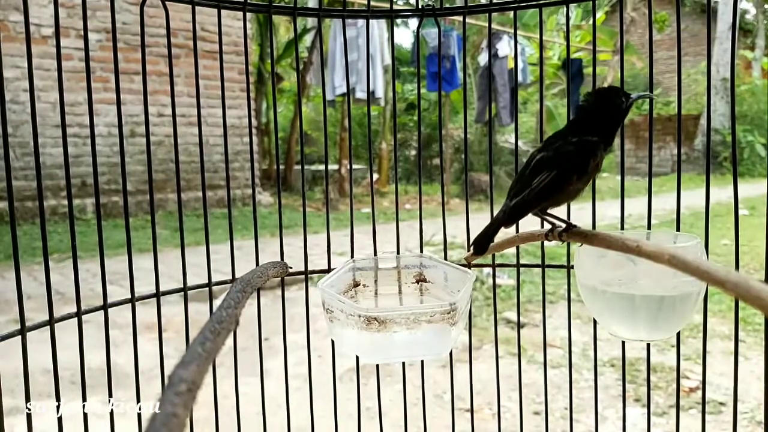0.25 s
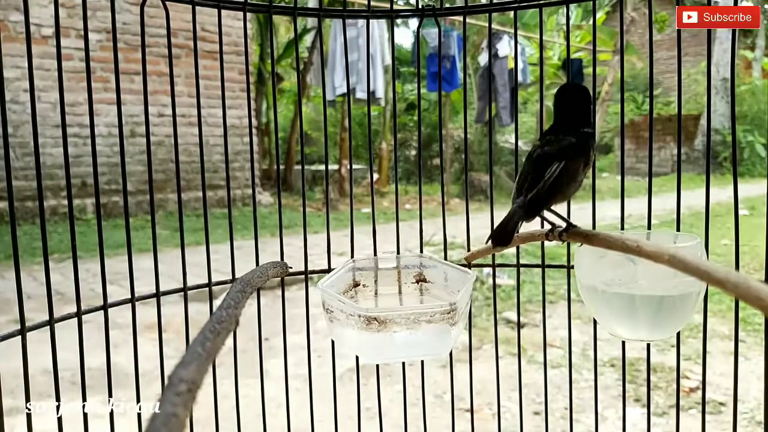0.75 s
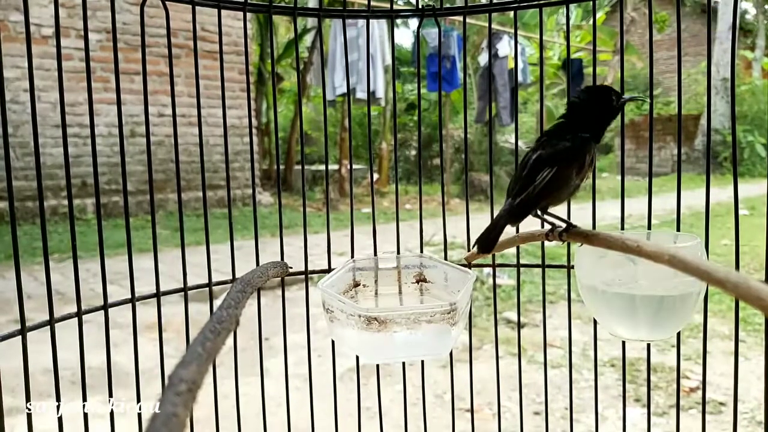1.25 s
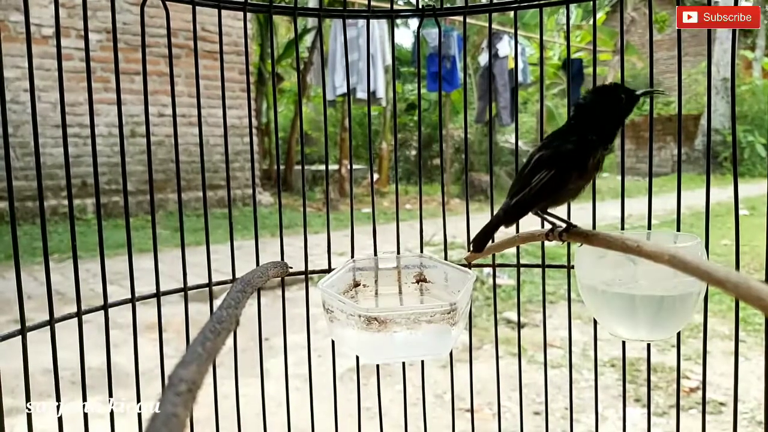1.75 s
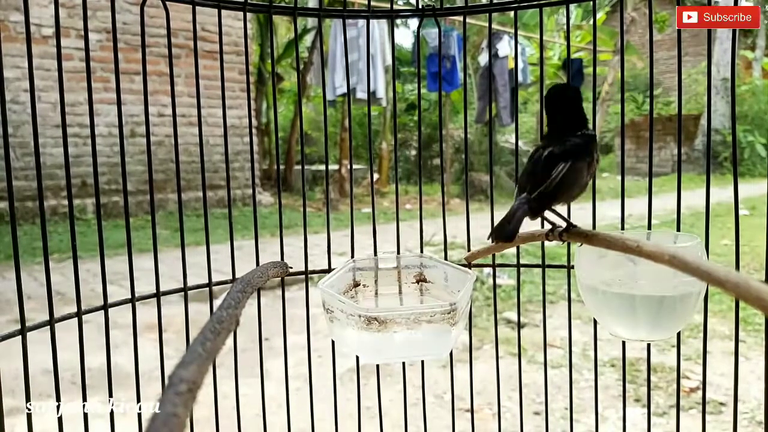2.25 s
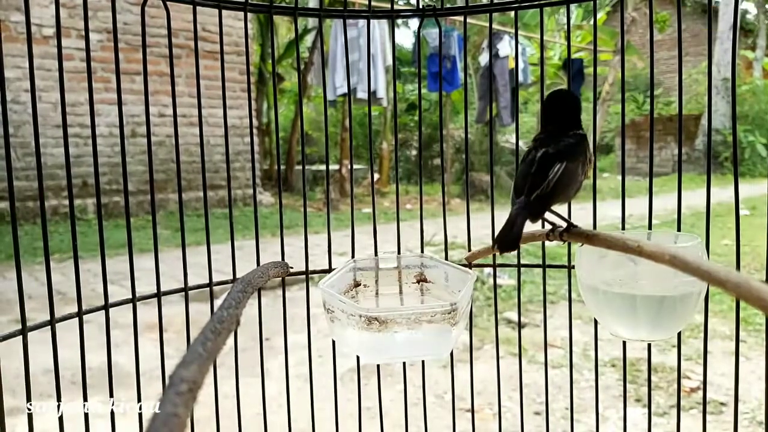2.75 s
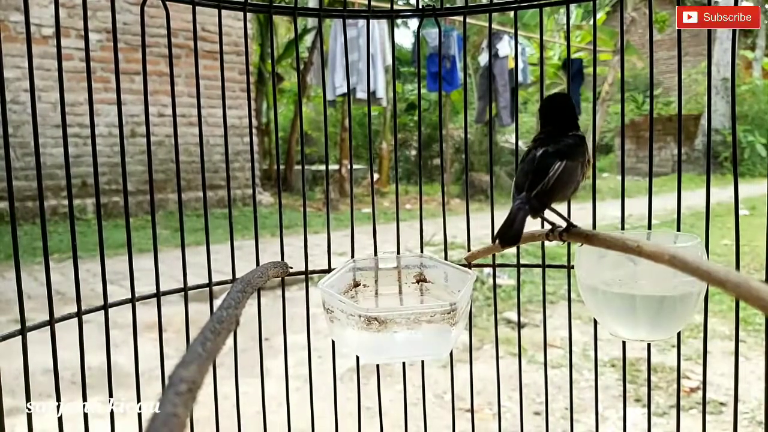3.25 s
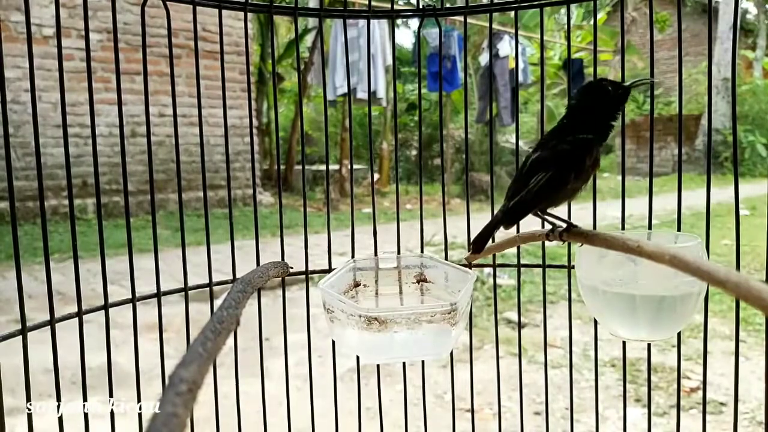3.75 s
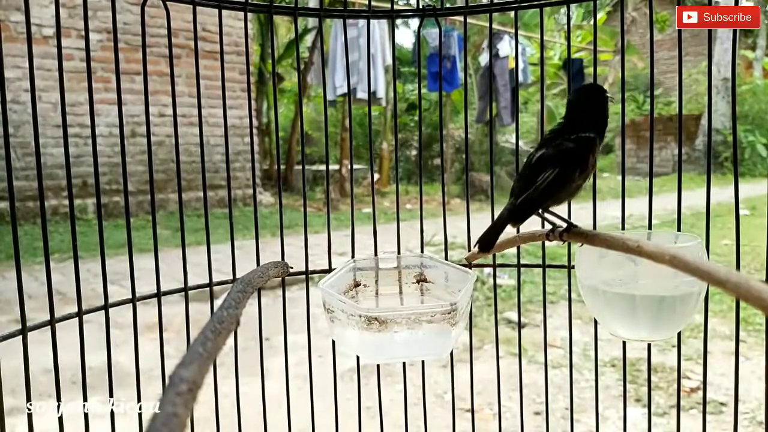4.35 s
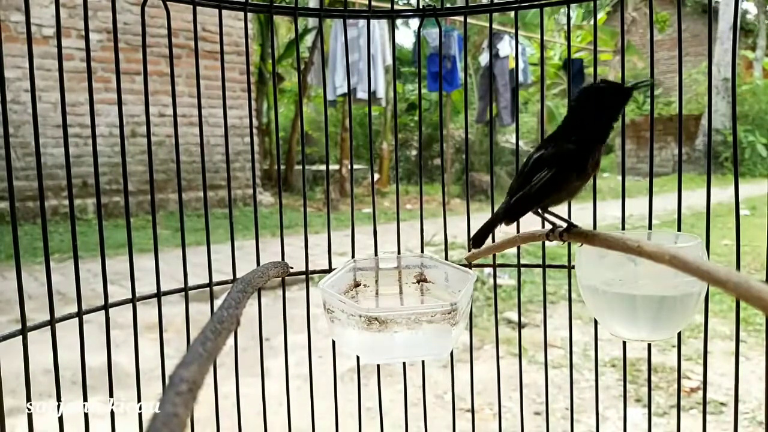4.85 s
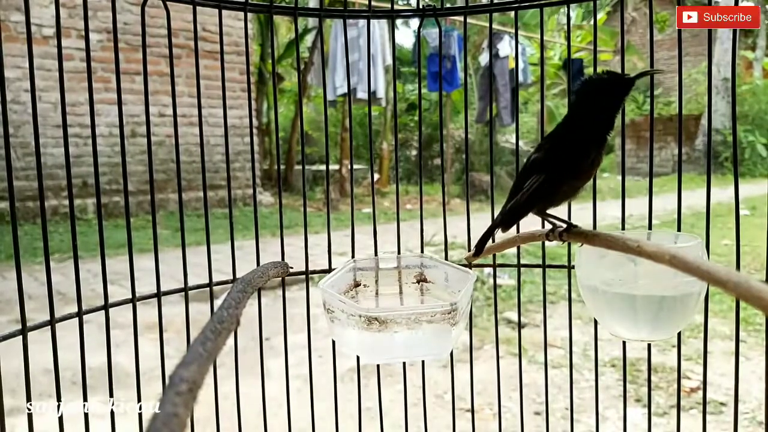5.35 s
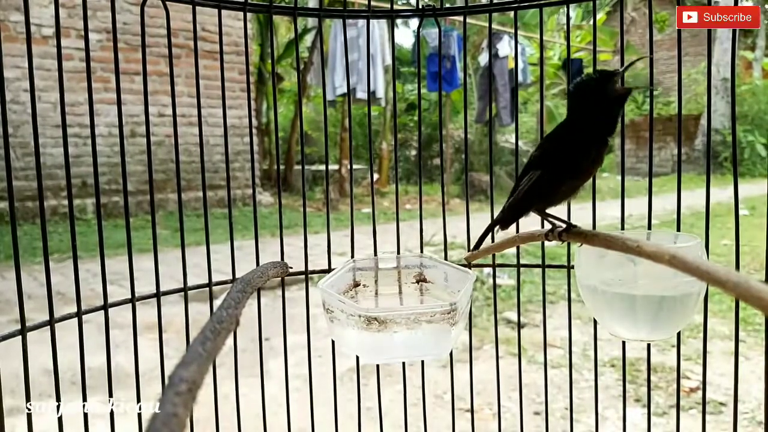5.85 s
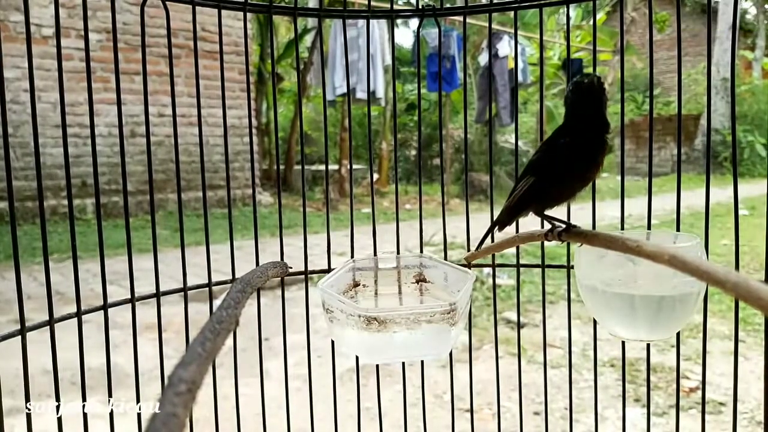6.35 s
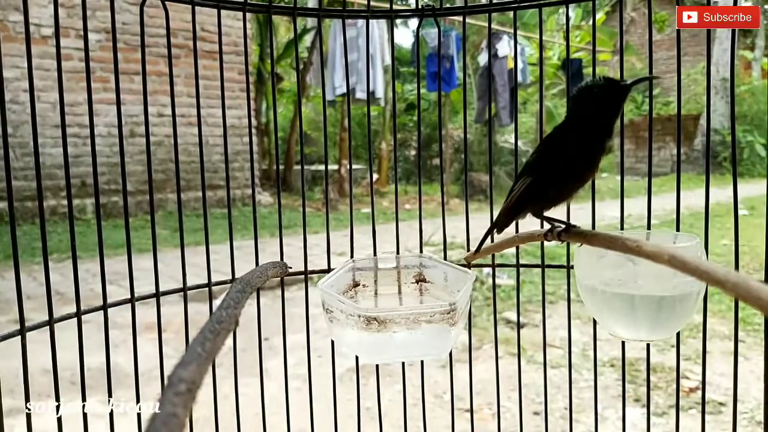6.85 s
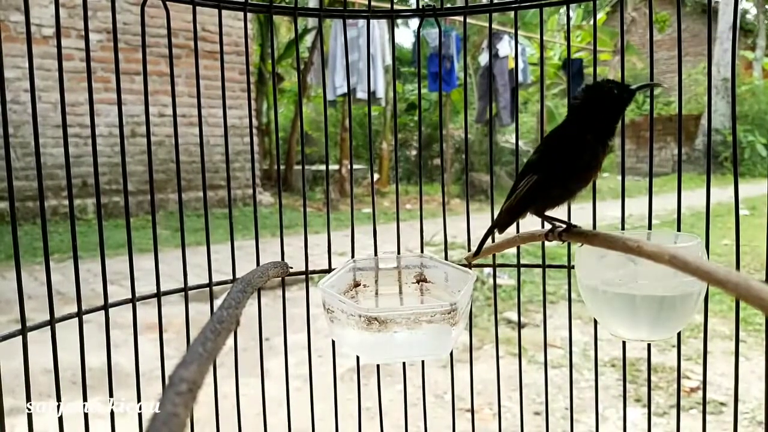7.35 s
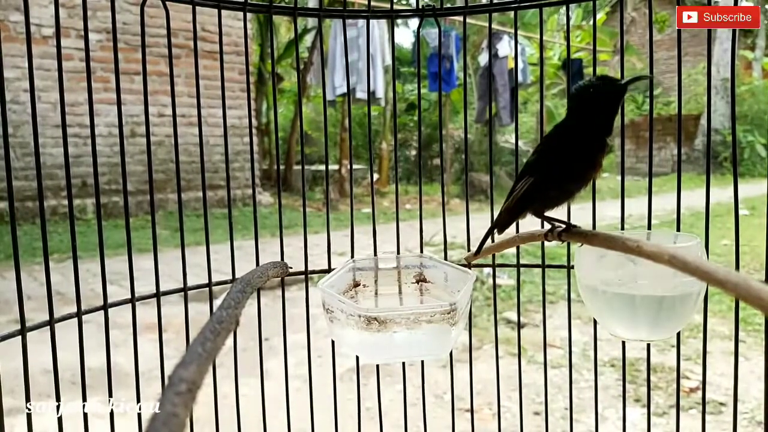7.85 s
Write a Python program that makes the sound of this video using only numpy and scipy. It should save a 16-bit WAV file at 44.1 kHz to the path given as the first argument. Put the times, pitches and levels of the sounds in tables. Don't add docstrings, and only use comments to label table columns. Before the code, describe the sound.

A small caged bird gives spaced piercing whistles, then a long rapid trill of falling notes, then more whistles, over faint engine hum outdoors.

```python
import sys
import numpy as np
from scipy import signal
from scipy.fft import rfft, irfft, next_fast_len
from scipy.io import wavfile
from scipy.ndimage import uniform_filter1d

SR = 44100
rng = np.random.default_rng(int(sys.argv[2]) if len(sys.argv) > 2 else 0)


def ratio_of_db(decibels):
    return 10 ** (np.asarray(decibels, float) / 20)


def persist_wave(psi):
    counts = np.round(np.clip(psi, -1, 1) * 32767).astype(np.int16)
    wavfile.write(sys.argv[1], SR, np.atleast_2d(counts).T)


N = 358091

# (time [s], engine level [dB], far bird level [dB])
AROUND = [(0.0, -51.5, -81.5), (0.41, -61.5, -71.5), (0.65, -57, -75.5), (0.9, -65, -72.5),
          (1.85, -61, -85), (2.22, -68.5, -91.5), (2.49, -56, -74.5), (2.87, -68, -81), (3.12, -66.5, -82),
          (3.28, -58, -52.5), (3.57, -57, -52), (4.25, -56, -54), (4.93, -61.5, -60), (5.22, -61.5, -96),
          (5.81, -59.5, -88), (7.08, -66, -73.5), (7.4, -63.5, -80), (8.12, -62, -78)]
# (frequency [Hz], level [dB per Hz])
YARD_SPECTRUM = [(25, -40.5), (60, -15), (110, -15), (190, -25.5), (300, -27.5), (600, -45), (1500, -41),
                 (3000, -52.5), (6500, -47.5), (8500, -48), (12000, -58), (16000, -70)]
# (frequency [Hz], correlation [ratio])
LIKENESS = [(60, .6), (180, 0.62), (550, 0.35), (1650, 0.26), (4970, 0.96), (15000, 0.03)]
# (time [s], centre [Hz], width [Hz], level [dB], left-right difference [dB])
FAR_CALLS = [
    (0.138, 2200, 300, -72.5, 6),
    (.14, 5500, 5000, -72, -0.2),
    (0.138, 600, 500, -72, -4),
    (5.32, 2500, 80, -76.5, 0),
    (5.42, 2000, 80, -70.5, 3.5),
    (6.35, 1500, 60, -82.5, -6),
    (6.553, 4200, 900, -67.5, -12.5),
    (6.888, 1100, 80, -72.5, 3.5),
]
# (time [s], length [s], pitch [Hz], left [dB], right [dB])
WHISTLES = [(-.11, 0.05, 6320, -13.5, -10.5), (0.3923, 0.054, 6306, -16, -8),
            (0.7899, .0524, 6332, -12.5, -9), (1.1217, 0.053, 6296, -6.5, -14.5),
            (1.3949, .0488, 6358, -16, -7), (1.6536, .0488, 6330, -16, -5),
            (1.9253, 0.049, 6347, -13, -8.5), (2.229, 0.048, 3900, -19.5, -22.5),
            (2.5274, 0.052, 6274, -8.5, -15), (5.4867, .048, 6237, -14, -5.5),
            (5.899, 0.043, 6240, -13, -5), (6.7615, 0.055, 6293, -10.5, -8.5),
            (7.1562, 0.047, 6330, -10, -9.5), (7.5377, 0.048, 6310, -17.5, -9.5)]
# (sag [Hz], left lag [us], octave left [dB], octave right [dB], thump [dB])
HEAD = [(80, 47.5, -29, -18.5, -80), (100, 36, -27, -12.5, -35.5), (140, -42.5, -39.5, -11.5, -31.5),
        (70, -55, -27.5, -15, -32), (110, 39.5, -35.5, -11, -30), (80, 55.5, -32.5, -12.5, -35),
        (130, 60.5, -34, -12.5, -32.5), (300, 52, -23.5, -27.5, -86), (30.4, -65, -26.5, -24.5, -47),
        (119, 48.5, -20.5, -14, -44), (90, 52, -33, -14, -42), (136, 42, -24.5, -12, -34),
        (80, 39, -31, -6.5, -34), (120, 38.5, -33, -9.5, -30)]
# (multiple of pitch [ratio], left [dB], right [dB])
WHISTLE_HALVES = [(.5, -39, -33), (1.5, -31.5, -28.5), (2.5, -38, -38.5)]
# (time [s], top [Hz], middle of fall after start [s], left [dB], right [dB])
TRILL = [(3.0872, 5237, 0.023, -12.5, -21.5), (3.163, 5418, .0174, -13, -19.5),
         (3.2414, 5460, .0188, -10, -17.5), (3.3224, 5527, .02, -7, -17), (3.4093, 5498, .0187, -7, -19),
         (3.4914, 5417, .0186, -12, -12), (3.5772, 5367, .0193, -12.5, -13.5),
         (3.6622, 5474, .021, -17.5, -8.5), (3.7513, 5610, 0.02, -17.5, -11.5),
         (3.842, 5344, .0214, -11.5, -11), (3.93, 5405, .0201, -9.5, -12.5),
         (4.0137, 5282, .0188, -11.5, -11), (4.1023, 5330, 0.02, -14.5, -13),
         (4.1907, 5573, .0213, -12, -11.5), (4.2847, 5324, .0194, -10, -13),
         (4.3774, 5523, 0.018, -12.5, -12.5), (4.4729, 5230, 0.018, -14, -12),
         (4.5619, 5420, .0221, -11, -18), (4.6595, 5502, 0.019, -9, -13), (4.7505, 5490, .022, -9.5, -16),
         (4.8519, 5323, .0212, -8, -20), (4.9414, 5320, .0207, -14, -12), (5.0379, 5563, .021, -13.5, -15),
         (8.055, 5250, .0239, -19.5, -16)]
# (time [s], left lag [us])
TRILL_LAG = [(3.1, 31), (3.42, 54), (3.6, 81), (4.2, 77), (4.45, 67.6), (5.05, 77), (8.06, 54)]
# (multiple of pitch [ratio], left [dB], right [dB])
TRILL_PARTIALS = [(2, -37.5, -27), (3, -42.5, -33), (4, -46, -42)]
# (frequency [Hz], left [dB], right [dB])
PORT_COMB = [(3200, -20.5, -15), (3511, -13.5, -6.5), (3900, -21, -10), (4335, 3.4, -9.5), (4640, -8.5, 3),
             (4972, 2.5, -1.5), (5382, -5.5, -6.3), (5310, -15, -1.9)]
# (delay [s], left [dB], right [dB])
ECHOES = [(.0021, -22.5, -19), (.0057, -17, -19), (.0093, -21.5, -19.5), (0.0164, -24, -25.5),
          (0.0224, -29.5, -22)]

LEAD_SAMPLES = 8192
HUM_LIFT_DB, NOISE_DB, NOISE_PER_HUM_DB = 4.5, -69, 0.64
CHATTER_PER_S, CHATTER_SLOWS_PER_DB = 11.5, .6
FAR_HOLD_S, FAR_DECAY_DB_PER_S = .12 * .6, 14 / .12
FLUTTER_DB = 2.57
OPEN_S, CLOSE_S, SHUT_DB, OPEN_DB, LAST_DB = 0.011, 0.0073, -32.5, 0, -1
STARTS_SAGS, LOWEST_SHARE, RECOVERS_SAGS, CLOSING_DROP_SHARE = 1.3, .64, 0.76, 0.065
RASP_DB, LOW_RASP_DB = (-32.5, -31), (-4, -26.5)
KNOCK_DB_PER_DB = 1.3
CLIMB_S, CLIMB_SHARE, FALL_S, TOP_OVERSHOOT = .008, .16, 0.0054, 1.0816
SHELF_S, OPENING_SHORTER_S, SHELF_SAG_HZ_PER_S = 0.027, .01, 9000
SHELF_HZ, OPENING_SHELF_HZ = 3400, 3600
SWELL_S, SWELL_DB, FADE_S, FADE_DB = 0.0057, -19, 0.011, -22.5
TRILL_WET_DB = -2.5
YARD_DB, YARD_T60_S, YARD_LATE_DB, YARD_LATE_T60_S, YARD_DULL_HZ = -22, 0.21, -24, 0.44, 8600
PEAK_LIMIT = 2.6


def at_hz(points, hz):
    points_hz, values = np.transpose(points)
    return np.interp(np.log(hz), np.log(points_hz), values)


def rms_one(x):
    return x / np.sqrt(np.mean(x ** 2) + 1e-20)


def band(x, low_hz, high_hz):
    sos = signal.butter(2, [low_hz, min(high_hz, .45 * SR)], "band", fs=SR, output="sos")
    return signal.sosfilt(sos, x)


def drift(rate_hz, size=N):
    pole = np.exp(-40 * np.pi * rate_hz / SR)
    noise = rng.standard_normal(size // 20 + 3002)
    slow = signal.lfilter([1], [1, -2 * pole, pole ** 2], noise)[3000:]
    return np.interp(np.arange(size) / 20, np.arange(len(slow)), rms_one(slow))


def engine_hum(hum_db):
    rumble = rng.standard_normal(N)
    low = rms_one(band(band(rumble, 88, 116), 59, 130))
    upper = ratio_of_db(-18.5) * rms_one(band(rumble, 275, 305))
    return (low + upper) * ratio_of_db(hum_db + HUM_LIFT_DB)


def yard_noise():
    out, together = 0, drift(6.6)
    edges_hz = 25 * 2 ** np.arange(0, 9.6, .5)
    white = rng.standard_normal((2, 2, N))
    for k, (low_hz, high_hz) in enumerate(zip(edges_hz, edges_hz[1:])):
        mid, side = band(white[k % 2], low_hz, high_hz)
        hz = np.sqrt(low_hz * high_hz)
        alike = np.clip(at_hz(LIKENESS, hz), -1, 1)
        gain = ratio_of_db(at_hz(YARD_SPECTRUM, hz) + 0.7 * together + 2.5 * drift(3))
        out = out + gain * (np.sqrt(1 + alike) * mid + np.sqrt(1 - alike) * side * [[1], [-1]])
    return out / np.sqrt(np.mean(band(out, 200, 900) ** 2))


def far_birds(far_db):
    far_db = np.minimum(far_db, -72)
    rate_hz = np.clip(CHATTER_PER_S + CHATTER_SLOWS_PER_DB * (far_db + 79), 5, CHATTER_PER_S)
    cycles = np.cumsum(rate_hz * (1 + 0.073 * drift(0.96))) / SR
    beat = uniform_filter1d(cycles % 1, size=401)
    white = rng.standard_normal((2, 2, N))
    chatter = rms_one(band(band(white[0], 3900, 4650), 3800, 4750))
    thin = rms_one(band(white[1], 6700, 6900))
    return chatter * ratio_of_db(far_db + 10 - 15 * beat) + thin * ratio_of_db(-70 + .3 * (far_db + 80) - 22 * beat)


def far_calls():
    out = np.zeros((2, N))
    rough = rng.standard_normal((2, N)) * ratio_of_db(2.4 * drift(60))
    for start_s, hz, width_hz, level_db, pan_db in FAR_CALLS:
        t = np.arange(N) / SR - start_s
        decay_db = np.clip(t - FAR_HOLD_S, 0, None) * FAR_DECAY_DB_PER_S
        shape = np.clip(t / .008, 0, 1) * ratio_of_db(-decay_db)
        low_hz = np.sqrt(hz ** 2 + width_hz ** 2 / 4) - width_hz / 2
        call = rms_one(band(rough, low_hz, low_hz + width_hz))
        out += call * shape * ratio_of_db(level_db + pan_db * np.c_[[.5, -.5]])
    return out


def bird_waver():
    rasp = rms_one(band(rng.standard_normal((2, N + LEAD_SAMPLES)), 4100, 7700))
    drifts = [drift(rate_hz, size=N + LEAD_SAMPLES) for rate_hz in (60, 67, 119, 90, 84.3)]
    return np.vstack([drifts, rasp])


def add_note(out, rows, partials, lag_us, waver, steady_db, rasp_db):
    s, hz, left_db, right_db = np.transpose(rows)
    at = np.arange(int(s[0] * SR), min(int(s[-1] * SR), N))
    place = at + LEAD_SAMPLES

    def smooth(values):
        return uniform_filter1d(np.interp(at / SR, s, values), size=45)

    pitch_hz = smooth(hz) * (1 + 0.0045 * waver[0, place])
    level = np.array([smooth(ratio_of_db(left_db)), smooth(ratio_of_db(right_db))]) * signal.windows.tukey(len(at), .08)
    unsteady = ratio_of_db(steady_db * np.sin(np.linspace(0, 2.8, len(at))) ** 4.7)
    lag_cycles = np.outer([lag_us * 1e-6, 0], pitch_hz)
    phase = 2 * np.pi * (np.cumsum(pitch_hz) / SR - lag_cycles)
    brighter = (pitch_hz.max() / pitch_hz) ** 2.2
    voice = brighter ** 2.0 * ratio_of_db(rasp_db) * unsteady * waver[-2:, place]
    for k, (multiple, *ports_db) in enumerate([(1, 0, 0.001)] + partials):
        multiple = round(2 * multiple) / 2
        wobble = waver[1 + k % 2, place]
        if multiple % 1 == 0:
            flutter = ratio_of_db(1.5 * multiple * wobble)
        else:
            flutter = unsteady * ratio_of_db(5.0 * wobble)
        heard = np.clip((15900 - multiple * pitch_hz) / 700, 0, 1)
        gain = np.sqrt(2) * ratio_of_db(np.c_[ports_db]) * flutter * heard * (brighter if k else 1)
        voice = voice + gain * np.sin(multiple * phase + k)
    out[:, place] += level * voice * ratio_of_db(FLUTTER_DB * waver[3:5, place])


def whistles(waver):
    out = np.zeros((2, N + LEAD_SAMPLES))
    for (s, length_s, hz, *ports_db), head in zip(WHISTLES, HEAD):
        sag_hz, lag_us, left_db, right_db, _ = head
        low = hz < 5000
        times = s + np.array([0, OPEN_S, LOWEST_SHARE * length_s, length_s - CLOSE_S, length_s])
        sags = np.array([STARTS_SAGS, 1, 0, RECOVERS_SAGS, RECOVERS_SAGS]) - .5
        pitch_hz = hz + sag_hz * sags - [0, 0, 0, 0, CLOSING_DROP_SHARE * hz]
        level_db = np.c_[[SHUT_DB, OPEN_DB, 0, LAST_DB, SHUT_DB]] + ports_db
        more = [(3, -32.5, -25.5), (4, -34.0, -44.5)] if low else WHISTLE_HALVES
        partials = [(2, left_db, right_db)] + list(more)
        rasp = LOW_RASP_DB if low else RASP_DB
        add_note(out, np.c_[times, pitch_hz, level_db], partials, lag_us, waver, *rasp)
    return out


def thumps(right):
    push = right ** 2 * (1 + 0.65 * drift(82))
    swell = band(band(push, 47, 700), 30, 170)
    knock = ratio_of_db(-6.87) * band(band(right ** 2, 410, 1000), 330, 1300)
    starts_s, thump_db = np.array(WHISTLES)[:, 0], np.array(HEAD)[:, 4]
    weaker_port_db = np.array(WHISTLES)[:, -2:].min(axis=1)
    note = np.clip(np.searchsorted(starts_s - .02, np.arange(N) / SR) - 1, 0, None)
    knock_db = KNOCK_DB_PER_DB * (weaker_port_db[note] + 9.5)
    return (ratio_of_db(thump_db[note] + 20) * swell + ratio_of_db(knock_db) * knock) * ratio_of_db(np.c_[[-17, 0]])


def trill(waver):
    out = np.zeros((2, N + LEAD_SAMPLES))
    comb_hz, *comb_db = np.transpose(PORT_COMB)
    for k, (s, top_hz, fall_s, left_db, right_db) in enumerate(TRILL):
        opening = k == 0 or s - TRILL[k - 1][0] > 1
        t = np.arange(0, fall_s + SHELF_S - opening * OPENING_SHORTER_S + FADE_S / 2, .0005)
        x = (t - fall_s) / FALL_S + 0.2
        s_curve = .5 - .5 * x / np.sqrt(1 + x ** 2)
        climb_hz = CLIMB_SHARE * top_hz * (.5 if opening else 1) * np.exp(-t / CLIMB_S)
        pitch_hz = SHELF_HZ + (TOP_OVERSHOOT * top_hz - SHELF_HZ) * s_curve - climb_hz
        pitch_hz = pitch_hz - SHELF_SAG_HZ_PER_S * np.clip(t - fall_s, 0, None)
        if opening:
            pitch_hz = np.maximum(pitch_hz, OPENING_SHELF_HZ)
        swell_db = SWELL_DB * np.clip(1 - t / SWELL_S, 0, 1)
        effort_db = swell_db + FADE_DB * np.clip(1 - (t[-1] - t) / FADE_S, 0, 1)
        heard_db = [effort_db + db + np.interp(pitch_hz, comb_hz, comb)
                    for db, comb in zip((left_db, right_db), comb_db)]
        lag_us = np.interp(s, *np.transpose(TRILL_LAG))
        add_note(out, np.c_[s + t, pitch_hz, np.transpose(heard_db)], list(TRILL_PARTIALS), lag_us, waver, 0, -34)
    return out


def yard_echoes(whistled, trilled):
    t = np.arange(SR) / SR
    quick = ratio_of_db(YARD_DB - 60 * t / YARD_T60_S) / np.sqrt(YARD_T60_S)
    slow = ratio_of_db(YARD_LATE_DB - 60 * t / YARD_LATE_T60_S)
    response = rng.standard_normal((2, 2, SR)) * (quick + slow) * np.clip(t / 0.034, 0, 1) * np.sqrt(7 / SR)
    for delay_s, left_db, right_db in ECHOES:
        response[0, 0, int(delay_s * SR * 1.04)] += ratio_of_db(left_db)
        response[1, 1, int(delay_s * SR)] += ratio_of_db(right_db)
    size = next_fast_len(N + LEAD_SAMPLES + SR)
    sent = rfft(whistled + ratio_of_db(TRILL_WET_DB) * trilled, size)
    wet = irfft(np.sum(rfft(band(response, 300, YARD_DULL_HZ), size) * sent, axis=1), size)
    return (whistled + trilled + wet[:, :N + LEAD_SAMPLES])[:, LEAD_SAMPLES:]


def scene():
    s, *columns = np.transpose(AROUND)
    hum_db, far_db = [np.interp(np.arange(N) / SR, s, column) for column in columns]
    noise_gain = ratio_of_db(NOISE_DB + NOISE_PER_HUM_DB * (hum_db - hum_db.mean()))
    around = engine_hum(hum_db) + noise_gain * yard_noise() + far_birds(far_db) + far_calls()
    waver = bird_waver()
    whistled = whistles(waver)
    bird = yard_echoes(ratio_of_db(np.c_[[-.6, -1.8]]) * whistled, ratio_of_db(2.58) * trill(waver))
    return bird + thumps(whistled[1, LEAD_SAMPLES:]) + around


def roll_off(x):
    return signal.sosfilt(signal.butter(12, 16800, fs=SR, output="sos"), x)


def record(dry):
    mix = PEAK_LIMIT * np.tanh(dry / PEAK_LIMIT)
    return roll_off(mix)


dry = scene()
out = record(dry)
persist_wave(out)
```